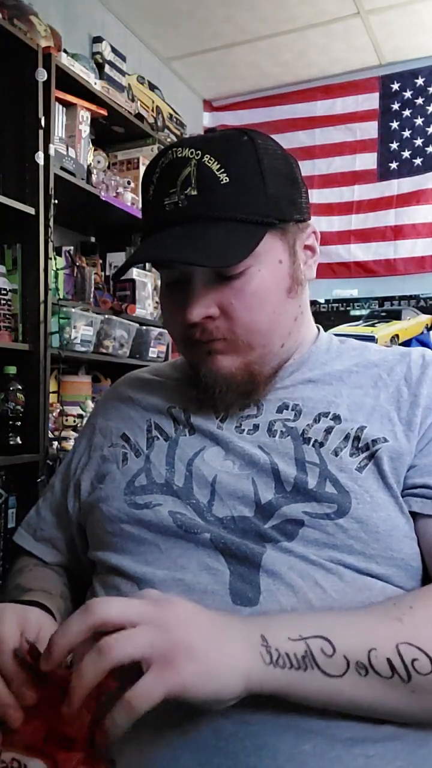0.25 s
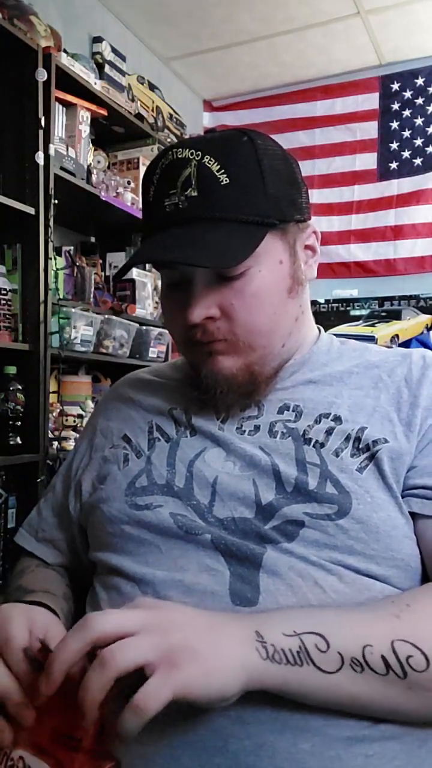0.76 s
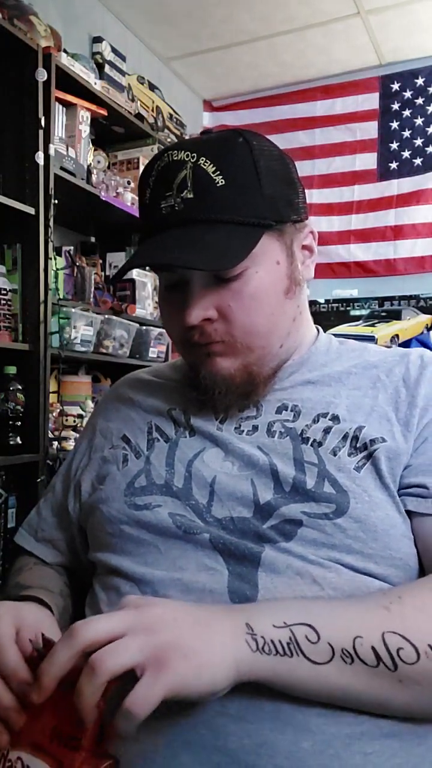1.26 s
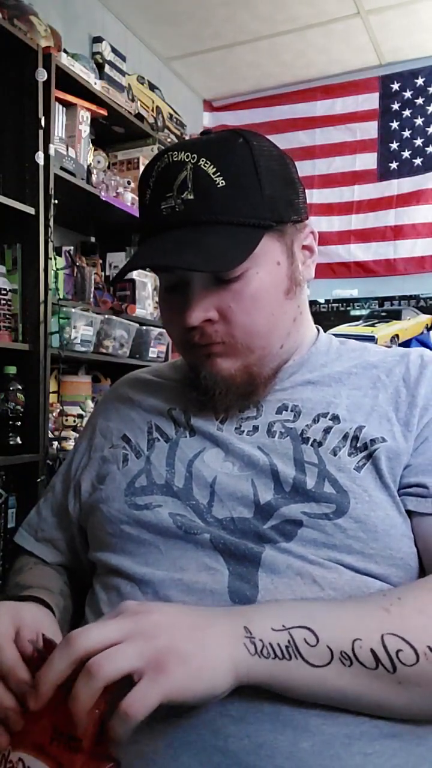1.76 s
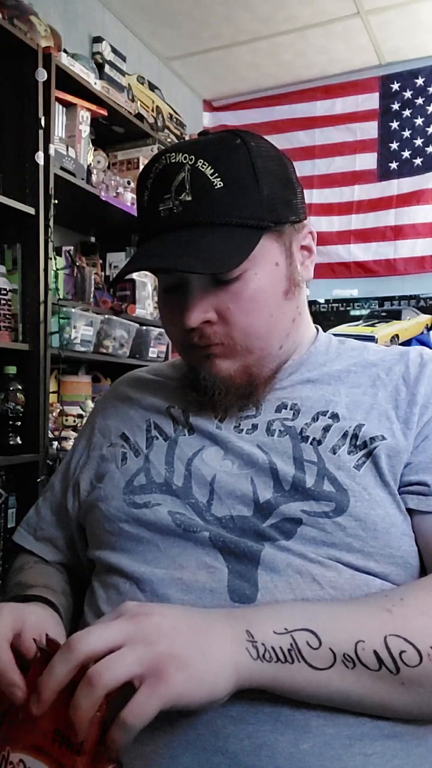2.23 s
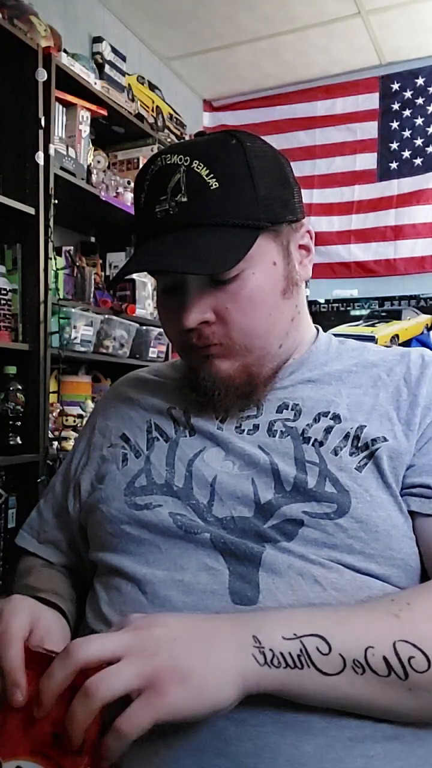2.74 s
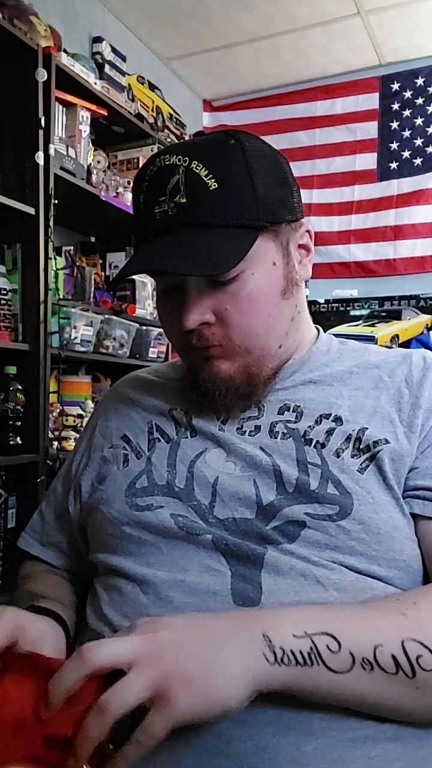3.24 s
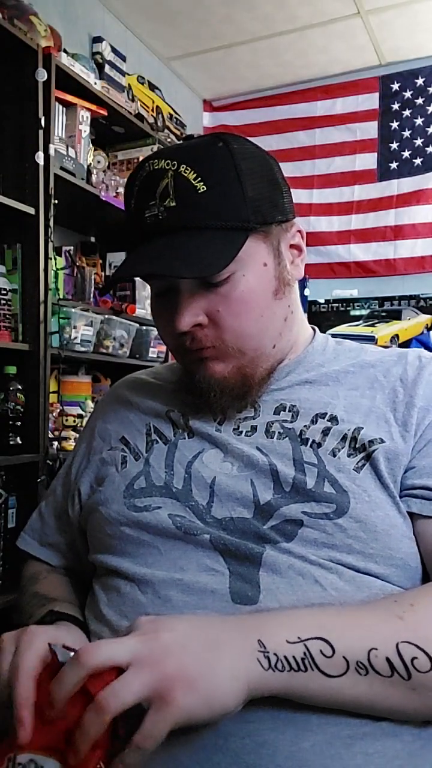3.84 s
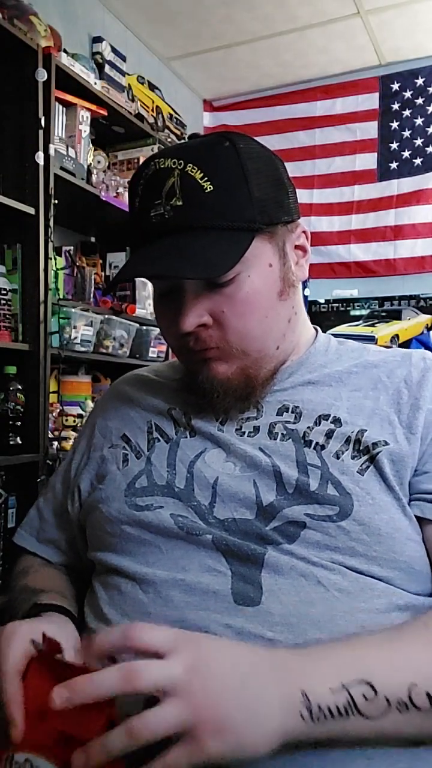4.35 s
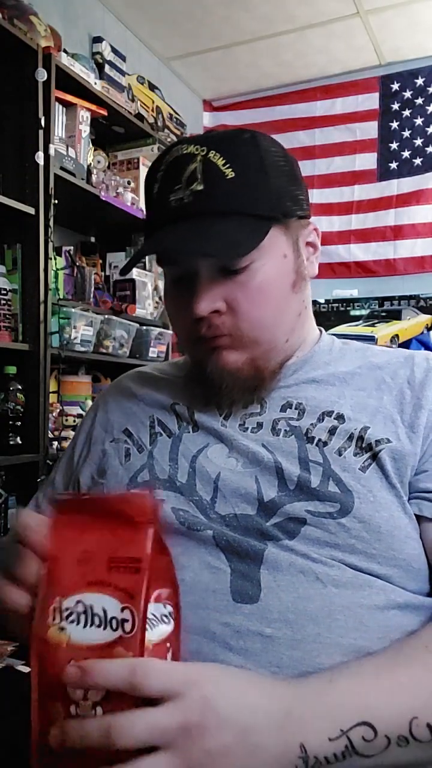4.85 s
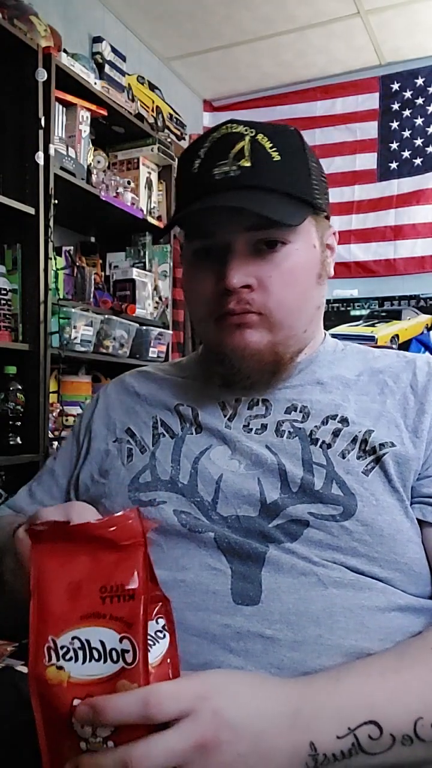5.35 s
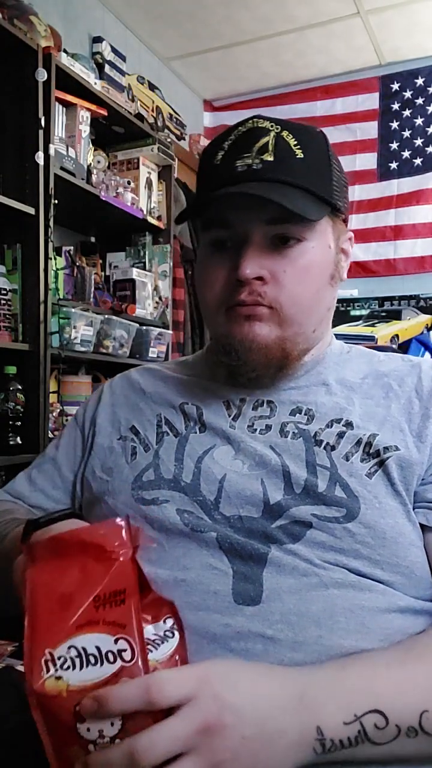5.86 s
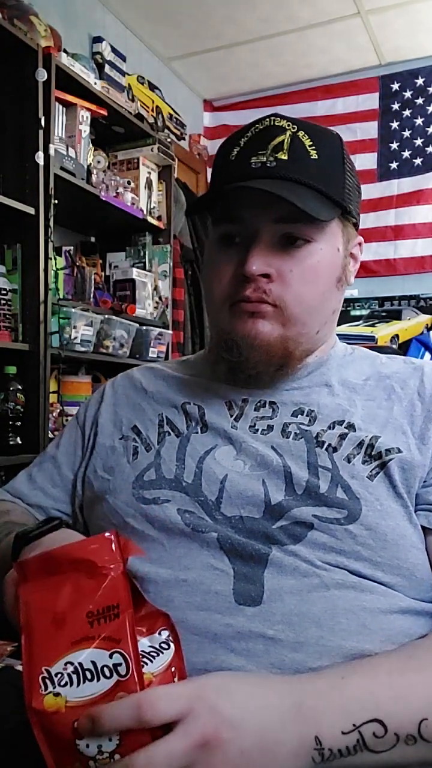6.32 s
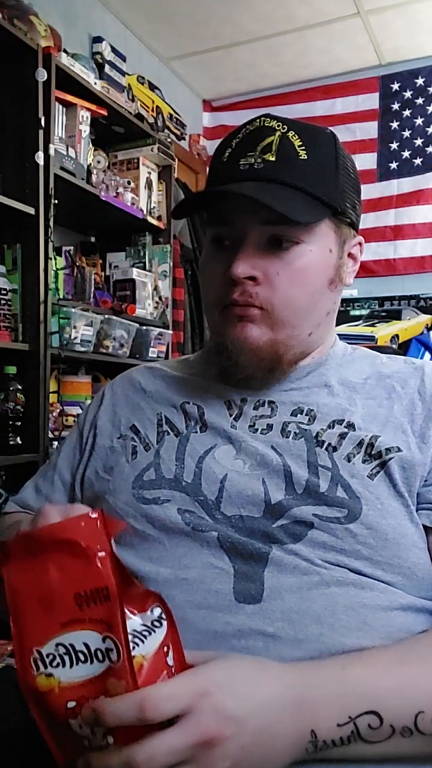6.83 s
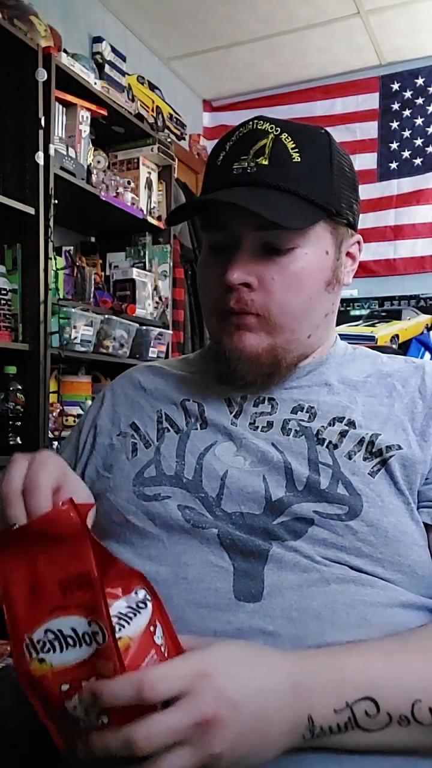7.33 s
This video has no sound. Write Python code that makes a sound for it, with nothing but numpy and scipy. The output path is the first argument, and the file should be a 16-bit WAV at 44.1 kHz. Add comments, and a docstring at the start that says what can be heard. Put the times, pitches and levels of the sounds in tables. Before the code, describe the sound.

A stiff plastic-lined snack bag is handled close to a stereo phone microphone in a small, fairly dry furnished room. A quiet fan hum, around middle C, wavers over soft moving air throughout. From 0 to 2 seconds there are scattered crinkles, a small cluster near 0.3, and lone bright snaps near 1.0, 1.4 and 1.9. After a near lull, crackling thickens from 2.5 and becomes dense and sharp from 3 to 4.6, with fullest snaps, brief rubs and dull hollow thuds around 4.0 and 4.25. After a short gap, thinner crinkles come from 4.8 as the bag is lifted, with strong pops at 5.35 and 5.7. A hand enters, adding faint steady sliding and a busy burst until 6.0. Quieter moments separate bursts at 6.6, 7.15 and 7.45, ending amid crisp crackles and a low thud.

```python
"""In a small furnished room, a stiff plastic-lined snack bag is picked at, pulled open, lifted and reached into.
Each buckling crease snaps: a pulse and filtered noise bursts ring the film for a few milliseconds.
Lesser creases, tiny ticks and sliding skin follow the effort of the fingers; rubs are swells of dense grains.
Flexing panels thud as noise pushes through the hollow's resonances. A faint fan hum wavers over moving air.
The room adds a short tail to the bag; the two ports of a close phone colour its sound differently."""
import sys
import numpy as np
from scipy import signal
from scipy.fft import rfft, irfft
from scipy.io import wavfile
from scipy.ndimage import uniform_filter1d

SR = 44100
rng = np.random.default_rng(int(sys.argv[2]) if len(sys.argv) > 2 else 0)


def log_audio(samples):
    """Write samples as a 16-bit WAV file to the path given in sys.argv[1]."""
    # one column per channel
    frames = np.atleast_2d(samples).T
    # limit to full scale, then quantise
    limited = np.clip(frames, -1, 1)
    pcm = np.round(limited * 32767).astype(np.int16)
    wavfile.write(sys.argv[1], SR, pcm)


N = 334626


def undb(db):
    """Amplitude ratio: 20 dB is a factor of ten in amplitude."""
    return 10 ** (np.asarray(db) / 20)


def unit(x):
    """Power normalisation: scale to rms 1."""
    return x / np.sqrt(np.mean(x ** 2) + 1e-30)


def colour(hz, points):
    """Spectral envelope: interpolate (Hz, value) points along a log-frequency axis."""
    at, value = np.transpose(points)
    return np.interp(np.log(hz + 1), np.log(at), value)


def causal(db):
    """Minimum phase by cepstral folding: the response starts at once and rings afterwards."""
    cepstrum = irfft(np.log(undb(db)))
    half = cepstrum.shape[-1] // 2
    cepstrum[..., 1:half] *= 2
    cepstrum[..., half + 1:] = 0
    return np.exp(rfft(cepstrum))


def bins(size):
    """Discrete Fourier analysis: the frequencies in Hz of a spectrum of this many samples."""
    return np.fft.rfftfreq(size, 1 / SR)


def convolve(x, response):
    """Linear superposition: pass a sound through an impulse response."""
    return signal.oaconvolve(x, response)[:N]


def shape(x, points):
    """Minimum-phase filtering by (Hz, dB) points."""
    return convolve(x, irfft(causal(colour(bins(1024), points))))


def resonate(x, hz, width_hz):
    """Simple resonance: a second-order peak with gain 1 at its centre."""
    return signal.lfilter(*signal.iirpeak(hz, hz / width_hz, fs=SR), x)


def add(track, start_s, sound):
    """Superposition: mix a sound into a track at a time."""
    start = max(int(start_s * SR), 0)
    part = sound[:max(N - start, 0)]
    track[start:start + len(part)] += part


def grain_sizes(count, spread_db):
    """Skewed event statistics: exponentially scattered levels with random polarity."""
    excess = np.minimum(rng.exponential(size=count), 3)
    return undb(spread_db * excess) * rng.choice([-1, 1], count)


def spread(common, apart, split_hz):
    """Diffuse-field coherence: two close ports agree in the bass and are unrelated in the treble."""
    angle = np.pi / 4 * np.clip(bins(len(common)) / split_hz, 0.35, 1)
    mid = rfft(common) * np.cos(angle)
    side = rfft(apart) * np.sin(angle)
    return irfft(np.array([mid + side, mid - side]), len(common))


# Slow level of the fan hum. Each row: time in seconds, level in dB before hum_db, pan_db and flutter.
HUM_LEVEL = [(0, -56), (.3, -55), (.5, -64.5), (1.5, -55), (2.35, -60.5), (2.7, -69), (3.2, -53),
             (3.95, -57), (4.55, -64), (5.2, -52), (6.0, -63), (7.59, -56.5)]
# Spectrum of the moving air. Each row: frequency in Hz, relative spectral level in dB.
AIR_COLOUR = [(30, -18.5), (90, -9), (150, -3.5), (205, -12.5), (280, -5), (380, -2.5), (560, -6.5),
              (840, 2.5), (1130, -8), (1500, -3), (1750, -10), (2300, -20), (5000, -32.5), (16000, -39)]


def fan(air_db=-57.5, hum_db=1.1, pan_db=1, waver=0.29):
    """Frequency and amplitude modulation of a tone: a slowly wavering hum over diffuse moving air."""
    hum_hz, swing_hz, swing_period_s, highest_s = 266.8, 2.06, 1.83, 0.97
    rise_from_s, rise_hz_per_s = 5.8, 3.92
    t = np.arange(N) / SR
    swing = swing_hz * np.cos(2 * np.pi * (t - highest_s) / swing_period_s)
    # late on, the hum creeps higher
    pitch_hz = hum_hz + swing + rise_hz_per_s * np.maximum(t - rise_from_s, 0)
    tone = np.sqrt(2) * np.sin(2 * np.pi * np.cumsum(pitch_hz) / SR)
    flutter = 1 + waver * unit(resonate(rng.standard_normal(N), 5.3, 20))
    level_db = np.interp(t, *np.transpose(HUM_LEVEL)) + hum_db
    hum = undb(level_db) * flutter * tone
    air = [unit(shape(rng.standard_normal(N), AIR_COLOUR)) for _ in range(2)]
    return undb(air_db) * spread(*air, split_hz=1380) + hum * undb([[pan_db], [-pan_db]])


# How hard the fingers work the film. Each row: time in seconds, effort in dB, from which other levels are set.
EFFORT = [(0, -66), (1.8, -71.5), (2.4, -71.5), (2.85, -56), (3.6, -56), (4.25, -57), (4.6, -58.5),
          (4.72, -71), (4.87, -54.5), (5.55, -57.5), (5.83, -49), (6.3, -65), (6.58, -49), (6.85, -69.5),
          (7.17, -44), (7.33, -61), (7.47, -42.5), (7.59, -73)]


def handling(s):
    """Common driving force: effort of the fingers in dB, interpolated at these times."""
    return np.interp(s, *np.transpose(EFFORT))


# Colour of the ticks before the film rings. Each row: frequency in Hz, relative level in dB.
TICK_COLOUR = [(100, 6), (350, 6), (800, 9), (1700, 6), (3000, -0.5), (6000, -6.5), (16000, -14.5)]


def ticks(per_s=200, spread_db=3.0, ring_s=0.00059, gain_db=-1):
    """Crackling noise: tiny wrinkles give way at random, in very unequal sizes. One track per face."""
    faces = len(FACE_LAGS)
    ring_t = np.arange(256) / SR
    happens = rng.random(N) < per_s / SR
    clicks = shape(grain_sizes(N, spread_db) * happens, TICK_COLOUR)
    # the fingers shift from face to face every 256 samples, about 6 ms
    face = np.repeat(rng.integers(0, faces, N // 256 + 1), 256)[:N]
    rings = rng.standard_normal((faces, 256)) * np.exp(-ring_t / ring_s)
    film = np.array([convolve(clicks * (face == k), unit(rings[k])) for k in range(faces)])
    effort = undb(handling(np.arange(N) / SR) + gain_db)
    return effort * unit(film) / np.sqrt(faces)


# Colour of skin sliding on the film. Each row: frequency in Hz, relative level in dB.
SLIDE_COLOUR = [(200, -20), (800, 7), (2000, 2), (5500, -3.5), (9000, -16), (16000, -6)]


def slide(gain_db=-10, inside_db=-67, enters_s=5.7, fade_s=0.13):
    """Friction noise: skin slides as the fingers work, and steadily once the hand is inside the bag."""
    t = np.arange(N) / SR
    inside = undb(inside_db) * np.clip((t - enters_s) / fade_s, 0, 1)
    level = undb(handling(t) + gain_db) + inside
    return level * unit(shape(rng.standard_normal(N), SLIDE_COLOUR))


# Bands of the room tail. Each row: centre in Hz, 60 dB decay time in seconds, relative level in dB.
TAIL_BANDS = [(195, 0.2, 0), (500, 0.092, 0), (1200, 0.052, -5.5), (2720, 0.12, -2.5), (6000, 0.1, -7),
              (12600, .11, -2.5)]


def room_tail(build_s=0.00043):
    """Reverberation: dense reflections from body, shelves and walls, decaying at a rate of their own in each band."""
    size = 8192
    t, hz = np.arange(size) / SR, bins(size)
    noise = rfft(rng.standard_normal(size))
    centres_hz = np.array(TAIL_BANDS)[:, 0]
    tail = np.zeros(size)
    # each band's share of the spectrum is 1 at its own centre and 0 at its neighbours'
    for (_, t60, db), share in zip(TAIL_BANDS, np.eye(len(TAIL_BANDS))):
        band = irfft(noise * colour(hz, np.c_[centres_hz, share]))
        decay = np.exp(-np.log(1000) * t / t60) * (1 - np.exp(-(t / build_s) ** 2))
        tail += undb(db) * band * unit(decay) / np.sqrt(size)
    return tail


def lesser_creases(count=90, crowding=0.4):
    """Driven random events: the harder the fingers work, the more creases give way and the louder."""
    above_effort_db, scatter_db, low_hz, high_hz, crack_db, fizz_db = 10.5, 2, 540, 4130, -11.5, -9.5

    def vary(chance):
        """Uniform scatter about zero, in dB."""
        return scatter_db * (2 * chance - 1)

    when, size, facet, crack, fizz = rng.random((count, 5)).T
    t = np.arange(N) / SR
    work = np.cumsum(undb(crowding * handling(t)))
    s = np.interp(when, work / work[-1], t)
    level_db = handling(s) + above_effort_db + vary(size)
    facet_hz = low_hz * (high_hz / low_hz) ** facet
    return np.c_[s, level_db, facet_hz, crack_db + vary(crack), fizz_db + vary(fizz)]


def panel_bass(s, db, crack_db):
    """Size and stiffness set radiation: bass of a snap against its mids, in dB."""
    lifted_s, lap_db, lifted_db = 4.45, 0, -7
    typical_snap_db, loss_per_db, bass_per_crack_db = -32, 0.5, 0.37
    # fuller while the bag rests in the lap, thinner once it is lifted free
    held_db = lap_db if s < lifted_s else lifted_db
    # a hard snap comes from a small stiff fold; a cracking one has weaker mids, so its bass stands out
    return held_db - loss_per_db * (db - typical_snap_db) + bass_per_crack_db * crack_db


# The creases that stand out. Each row: start in seconds, level in dB before gain_db, facet pitch in Hz,
# crack against mids in dB, fizz against crack in dB.
MAIN_CREASES = [(.008, -41, 546, -2, -7.5), (.115, -49, 6700, -7, -26), (.258, -35, 2400, 0.5, -16),
                (.309, -33.5, 1370, 0.5, -13.5), (.345, -29.5, 596, -11.5, -25), (.356, -36, 453, 4, -3),
                (.436, -53.5, 820, 16.5, -25), (.5175, -43.5, 690, -0.5, -15), (.643, -42, 765, -14, -16),
                (.687, -39, 650, -5.5, -17), (.722, -46, 4500, -7, -20), (.85, -41, 440, -3.5, -12),
                (.9565, -27, 4960, -7.5, -4.5), (1.092, -43.5, 5800, -10.5, -14),
                (1.127, -50.5, 5500, -3, -10), (1.175, -44.5, 790, -14, -24),
                (1.4114, -29, 6000, -5.5, -0.5), (1.654, -52, 820, -5, -4), (1.713, -55, 468, 3, -13),
                (1.792, -49, 540, 7.5, -10), (1.802, -40, 454, -5, -21), (1.937, -26.5, 5870, -1, -4),
                (2.421, -53.5, 1200, -1, -14), (2.459, -49.5, 900, -12, -21), (2.541, -42, 437, -1.5, -14),
                (2.571, -42, 1050, -13, -9), (2.587, -38.5, 1160, -2, -27.5), (2.653, -37, 2580, 11.5, -27),
                (2.694, -39.5, 1900, -8.5, -14), (2.769, -35, 7600, -9, -21), (2.815, -38, 990, -6, -22.5),
                (2.836, -29, 2750, -9, -7.5), (2.862, -33.5, 2000, 26, -24), (2.945, -37, 6060, -10, 2),
                (2.957, -29.5, 1020, 6.5, -6.5), (2.970, -29, 540, -11, -25), (2.979, -30.5, 1030, 3, -6),
                (2.987, -31.5, 750, 23, -3), (3.0045, -25, 1800, 9, -15), (3.0454, -45, 900, -4, -11),
                (3.081, -22.5, 2740, -8.5, -10), (3.128, -30, 2290, 2, -9), (3.1394, -32, 1800, 10, -12),
                (3.156, -27, 2500, 7.5, -17), (3.195, -28.5, 1970, 1, 0.5), (3.211, -30.5, 2860, -3, -8),
                (3.275, -37.5, 640, -21.5, -16), (3.285, -39.5, 1200, -17, -10),
                (3.305, -34.5, 2200, 10, -16), (3.352, -30, 710, 6, -12), (3.398, -32, 6300, -2, -8),
                (3.4135, -31.5, 6100, -2, -11), (3.453, -40, 2200, -11, -12), (3.469, -26, 2170, 5, -3.5),
                (3.537, -23.5, 610, 9, -9), (3.568, -27.5, 1850, 2, -17), (3.603, -32, 5550, -18, -14),
                (3.6845, -33, 1710, -2, -11), (3.758, -39.5, 2900, -7, -4), (3.812, -27, 2230, -3, -9),
                (3.861, -35, 540, 2, -13), (3.938, -35.5, 610, -10, -3), (3.947, -31, 750, 4, -17),
                (3.961, -24.5, 620, -5, -2), (3.969, -23, 5340, 0, -13), (3.979, -20, 674, -5.5, -4),
                (4.011, -27.5, 624, -1, -6), (4.026, -31, 950, -1.5, -2), (4.0385, -28, 850, -1.5, -12),
                (4.06, -37, 750, 17, -7), (4.072, -27.5, 3260, -6.5, -6), (4.126, -40.5, 630, -18, -31),
                (4.16, -43, 650, -8, -5), (4.196, -22.5, 3600, 5.5, -21), (4.205, -24, 2900, -4, 3),
                (4.223, -26, 635, 2, -14), (4.247, -28.5, 694, -2.5, -10.5), (4.267, -35, 450, 7, -10),
                (4.294, -36.5, 680, -9, -11), (4.388, -30.5, 1920, 8, -13), (4.402, -27.5, 790, 7.5, -3.5),
                (4.446, -27.5, 2900, 0, -9), (4.4985, -34, 2200, -2, -9), (4.543, -28, 3400, -1.5, -6),
                (4.612, -33, 6600, -4, -2.5), (4.634, -42, 1900, 1, -9), (4.8335, -30, 670, -7.5, -10.5),
                (4.89, -41.5, 650, -23, -4), (4.916, -37.5, 1120, -4.5, -28), (4.9515, -35, 1310, 1.5, -14),
                (4.965, -37.5, 2200, -5, -14.5), (4.974, -42, 2100, -5, -26),
                (5.008, -29.5, 1180, -2.5, -10), (5.061, -33, 1290, -5, -21),
                (5.195, -34, 820, -3.5, -13.5), (5.243, -32, 462, -12, -13), (5.313, -35.5, 4740, -9, 0.5),
                (5.350, -19.5, 1560, -2.5, -6), (5.429, -30, 660, -4, -7.5), (5.486, -47, 1660, 15, -5),
                (5.587, -37.5, 4130, -14, 2), (5.637, -31, 524, -8, -6.5), (5.686, -23, 500, -19, -15),
                (5.6897, -18, 1580, -0.5, -12.5), (5.725, -29, 1200, -2, 0),
                (5.756, -36.5, 720, -10, -13.5), (5.787, -33.5, 1120, -11, -26),
                (5.838, -37.5, 2640, -7, -26), (5.858, -28.5, 1070, -16, -18.5), (5.9, -24.5, 1450, 7, -7),
                (5.926, -24.5, 2030, 3, -10), (5.937, -30.5, 1200, 19, -7), (5.9686, -30, 2280, 1.5, -42.5),
                (6.0, -29.5, 1700, -3.5, -8.5), (6.146, -37, 770, 5.5, -23), (6.435, -40, 7500, 20, -22),
                (6.491, -37, 620, -6, -36), (6.508, -32, 6630, -4.5, -20), (6.527, -39.5, 2170, -4, -10),
                (6.588, -30, 1200, -3.5, -7), (6.610, -25, 1450, 8, -16.5), (6.628, -27.5, 620, -1.5, -10),
                (6.638, -22, 490, -5.5, -15), (6.881, -40.5, 2020, -1.5, -10.5),
                (6.964, -33.5, 2330, -5.5, -12), (7.105, -34, 2000, -15, -17), (7.115, -30.5, 940, -1, -26),
                (7.167, -22, 1380, 8.5, -4), (7.228, -29.5, 5200, -11.5, -2),
                (7.265, -33.5, 5100, -7.5, -12), (7.39, -35.5, 1050, 4.5, -11),
                (7.396, -28.5, 2240, -10, -5), (7.446, -32, 1200, 11, -22), (7.460, -23.5, 1300, 8, -21),
                (7.494, -27.5, 550, -2.5, -19), (7.5285, -29, 1310, 2, -19), (7.54, -22, 1020, -5, -11)]


def snaps(ring_s=0.0013, settle_s=0.002, settle_db=-6, facet_db=7, facet_width=0.27, gain_db=23.0):
    """Snap-through buckling: a crease flips with a pulse, rings its facet and settles. One track per face."""
    size = 2048
    t, hz = np.arange(size) / SR, bins(size)
    faces = np.zeros((len(FACE_LAGS), N))
    for k, (s, db, facet_hz, crack_db, fizz_db) in enumerate(np.vstack([MAIN_CREASES, lesser_creases()])):
        ring = rng.standard_normal(size) * np.exp(-t / ring_s)
        # cubing the noise leaves a few strong slips among weak ones
        slips = rng.standard_normal(size) ** 3 * np.exp(-t / settle_s)
        push = (unit(ring) + undb(settle_db) * unit(slips)) / np.sqrt(size)
        push[0] += rng.choice([-1, 1])
        push = rfft(push)
        # flatten the push broadly, so that all the colour comes from the film
        film_db = -10 * np.log10(uniform_filter1d(np.abs(push) ** 2, size=32))
        # big panels add bass, tight folds add crack and fizz
        bass_db = panel_bass(s, db, crack_db)
        film_db += colour(hz, [(70, bass_db - 18), (330, bass_db), (800, 0.003), (1700, 0.0093),
                               (4200, crack_db), (10000, crack_db + fizz_db)])
        # the facet rings at its own pitch; facet_width is in natural-log frequency
        film_db += facet_db * np.exp(-(np.log((hz + 1) / facet_hz) / facet_width) ** 2)
        snap = unit(irfft(push * causal(film_db))) / np.sqrt(size)
        add(faces[k % len(faces)], s, undb(db + gain_db) * snap)
    return faces


# Fingers dragging over the film. Each row: middle in seconds, half length in seconds,
# level in dB before gain_db, pitch in Hz.
RUB_EVENTS = [(0.344, 0.037, -49.5, 695), (2.966, 0.0099, -38, 604), (3.357, 0.016, -38, 900),
              (3.975, .022, -33.5, 800), (4.028, 0.014, -34.5, 694), (4.256, 0.04, -43, 750),
              (5.435, 0.012, -32.5, 1020), (5.688, 0.0046, -22.5, 500), (5.791, .012, -46, 1000),
              (6.631, 0.0055, -30.5, 1290), (7.11, 0.025, -34.5, 1460), (7.471, 0.044, -40, 1290)]


def rubs(per_s=1500, spread_db=4, breadth=0.6, gain_db=-2):
    """Stick-slip friction: a short swell of dense grains excites one panel's resonance."""
    t = np.arange(-4096, 4096) / SR
    out = np.zeros(N)
    for s, half_s, db, hz in RUB_EVENTS:
        grains = grain_sizes(len(t), spread_db) * (rng.random(len(t)) < per_s / SR)
        panel = unit(resonate(grains, hz, hz * breadth))
        swell = np.exp(-(t / half_s) ** 2)
        add(out, s + t[0], undb(db + gain_db) * panel * swell)
    return out


# Whole panels flexing under the hands. Each row: start in seconds, level in dB before gain_db, thud pitch in Hz.
PANEL_FLEXES = [(1.414, -48, 169), (2.581, -47, 135), (2.965, -50, 123), (3.089, -49, 166),
                (3.529, -45, 119), (3.567, -43.5, 138), (3.969, -35, 124), (4.012, -38, 130),
                (4.037, -43, 123), (4.241, -44.5, 164), (5.062, -48, 123), (5.43, -40.5, 112),
                (6.637, -43.5, 177), (7.455, -38.5, 119), (7.485, -44.5, 107), (7.539, -48, 83.4)]
# Hollow of the bag. Each row: frequency in Hz, width in Hz, level in dB against the panel's own thud.
HOLLOW_MODES = [(256, 17.4, -2), (370, 300, -9.5), (472, 46, -3), (650, 40, -2), (820, 47, -5.5)]


def flexes(push_s=0.0056, hard_hz=600, panel_width_hz=45, gain_db=-5):
    """Cavity resonance: a panel pops over and shoves the air and snacks inside, a short hollow thud."""
    t = np.arange(4096) / SR
    out = np.zeros(N)
    for s, db, panel_hz in PANEL_FLEXES:
        contact = signal.butter(2, [panel_hz * 0.53, hard_hz], "bandpass", fs=SR, output="sos")
        push = signal.sosfilt(contact, rng.standard_normal(len(t)) * np.exp(-t / push_s))
        panel = unit(resonate(push, panel_hz, panel_width_hz))
        hollow = sum(undb(mode_db) * unit(resonate(push, hz, width)) for hz, width, mode_db in HOLLOW_MODES)
        add(out, s, undb(db + gain_db) * unit(panel + hollow))
    return out


# Paths from the faces of the bag. Each entry: delay in samples of the left port behind the right.
FACE_LAGS = [3, 5, 6, 7, 8, 10]
# Response of the microphone ports. Each row: frequency in Hz, left in dB, right in dB.
PORT_COLOUR = [(65.6, -9.5, -14.5), (379, 2.5, 6.5), (550, -7.5, -3.5), (800, -0.5, 1.5), (1016, -3, -1),
               (1627, -1.5, 3.5), (1785, 10, -1.5), (1950, -7, 0.5), (2900, 2, 0.5), (3600, -4, 2),
               (6110, -2.5, 8.5), (8380, -1.5, -5.5), (11700, 0, 4), (16300, -11.5, -6.5)]


def scene():
    """Multipath propagation: each face reaches the two ports straight and round the room."""
    faces = snaps() + ticks()
    faces[len(faces) // 2] += flexes() + rubs() + slide()
    heard = np.zeros((2, N))
    for sound, lag in zip(faces, FACE_LAGS):
        left, right = spread(room_tail(), room_tail(), split_hz=1750)
        # the direct sound
        left[lag] += 1
        right[0] += 1
        heard += [convolve(sound, left), convolve(sound, right)]
    ports = np.array(PORT_COLOUR)
    coloured = [shape(heard[c], ports[:, [0, c + 1]]) for c in range(2)]
    return np.array(coloured) + fan()


def record(dry, top_hz=16000):
    """Saturation and band limiting: the phone rounds the highest peaks and cuts the top."""
    low_pass = signal.ellip(8, 0.2, 70, top_hz, fs=SR, output="sos")
    return signal.sosfilt(low_pass, np.tanh(dry))


dry = scene()
out = record(dry)
log_audio(out)
```